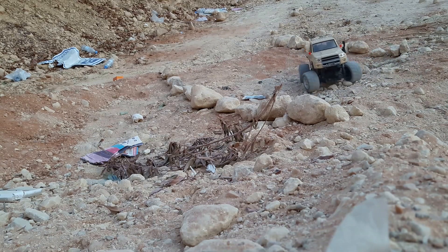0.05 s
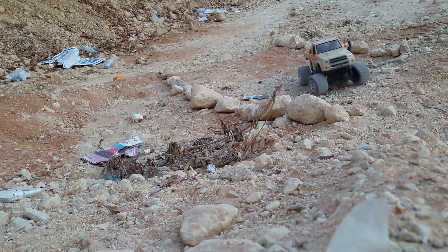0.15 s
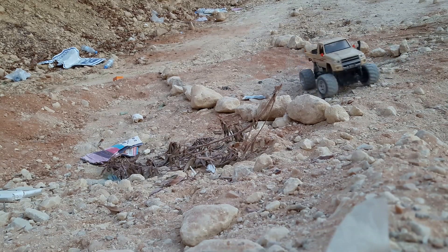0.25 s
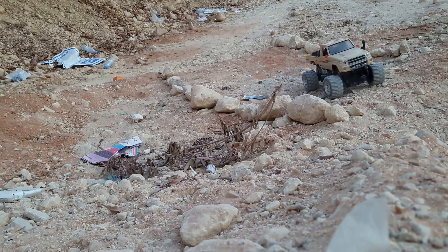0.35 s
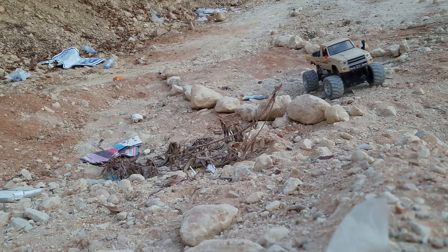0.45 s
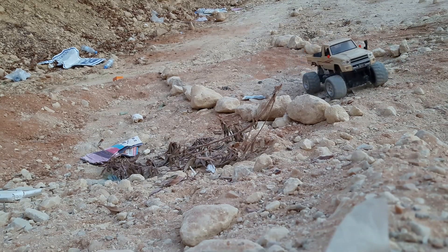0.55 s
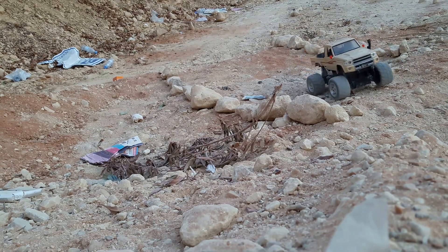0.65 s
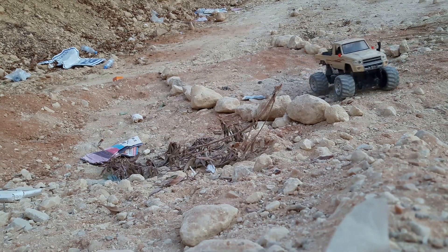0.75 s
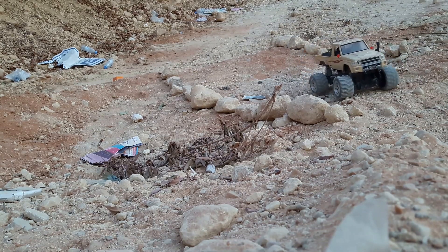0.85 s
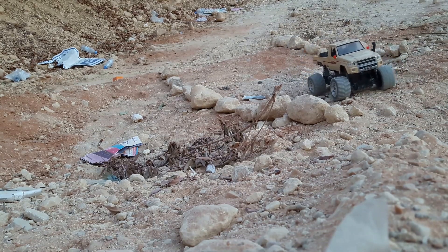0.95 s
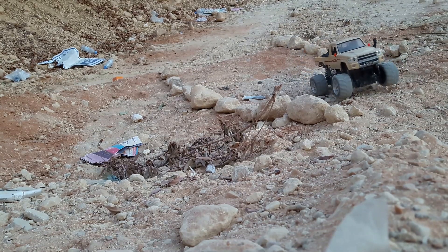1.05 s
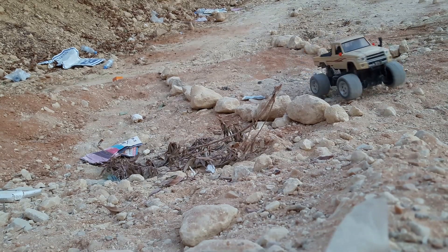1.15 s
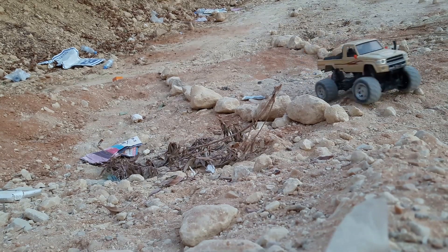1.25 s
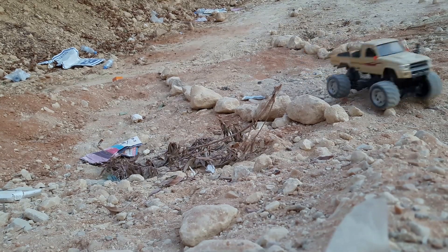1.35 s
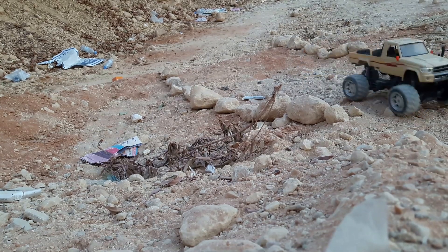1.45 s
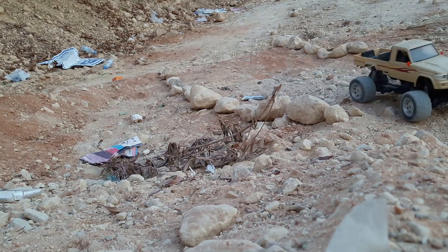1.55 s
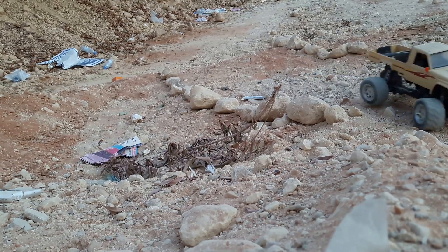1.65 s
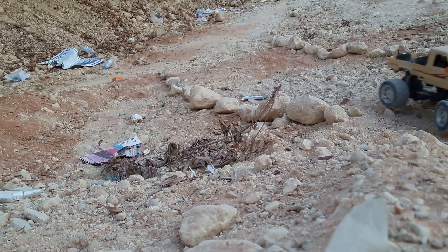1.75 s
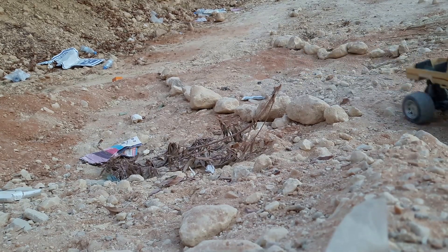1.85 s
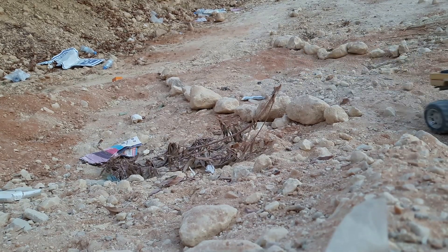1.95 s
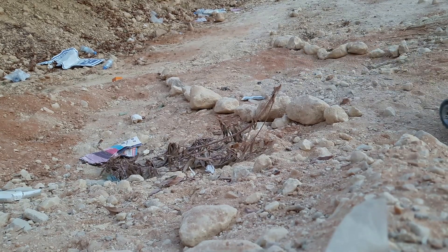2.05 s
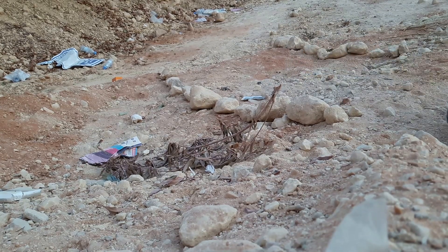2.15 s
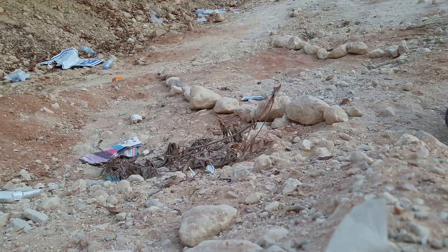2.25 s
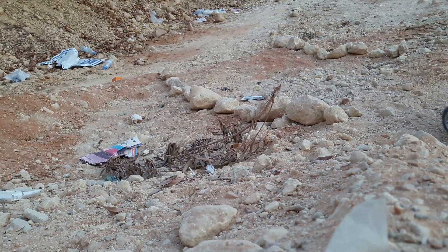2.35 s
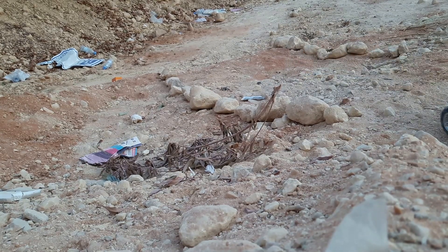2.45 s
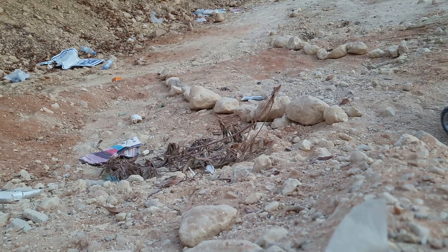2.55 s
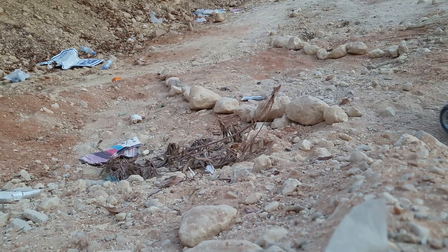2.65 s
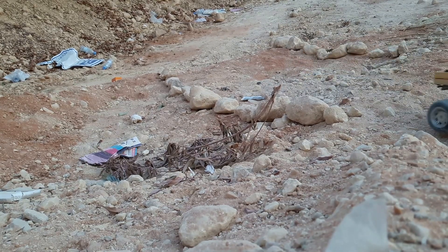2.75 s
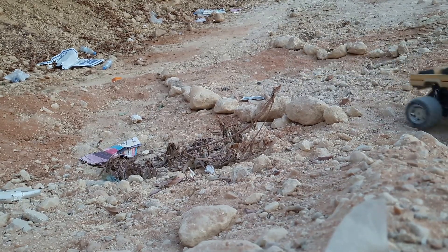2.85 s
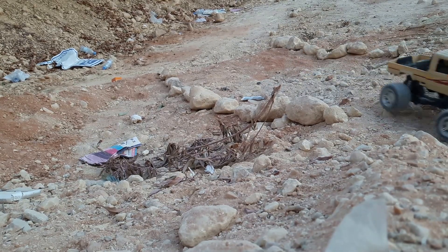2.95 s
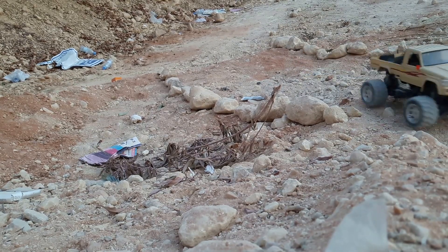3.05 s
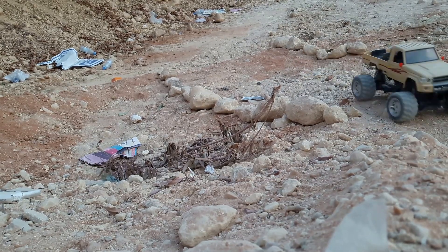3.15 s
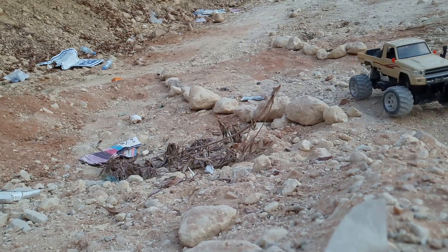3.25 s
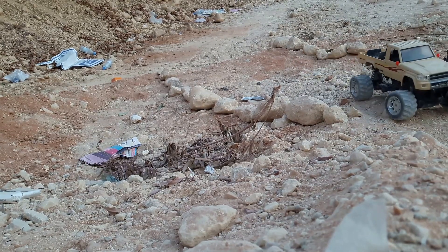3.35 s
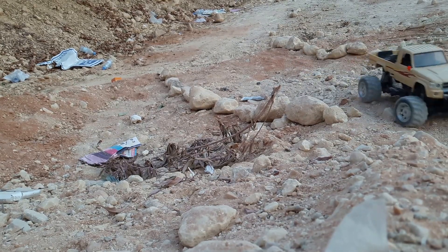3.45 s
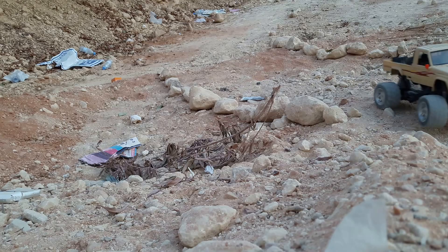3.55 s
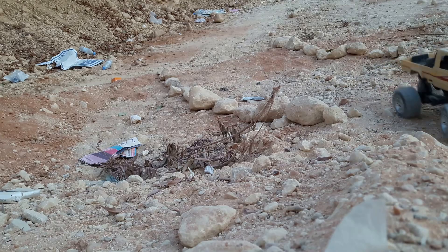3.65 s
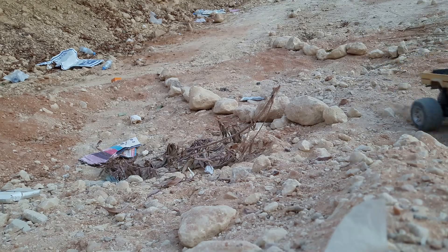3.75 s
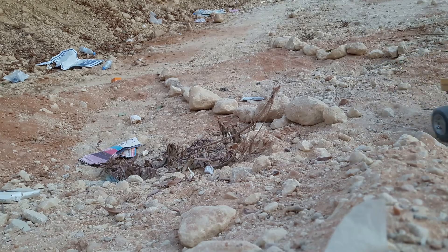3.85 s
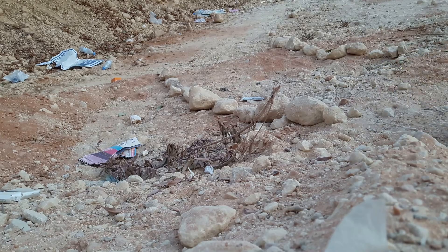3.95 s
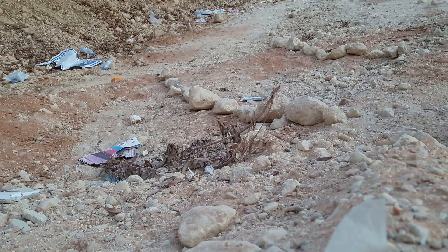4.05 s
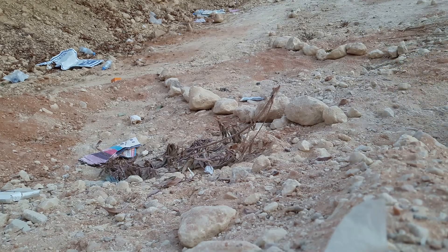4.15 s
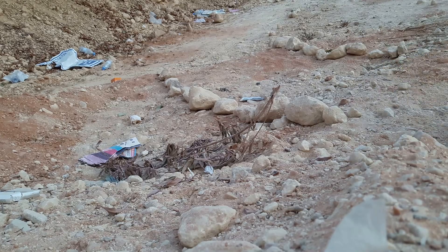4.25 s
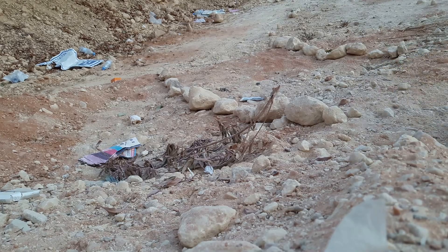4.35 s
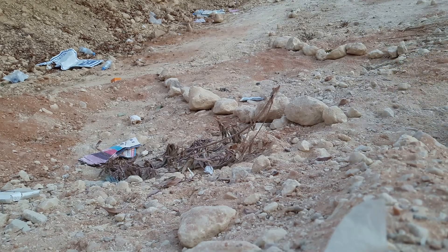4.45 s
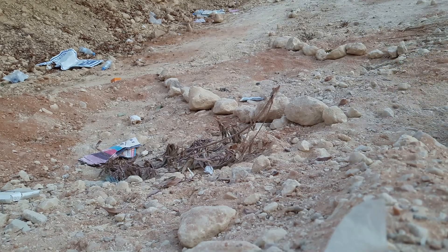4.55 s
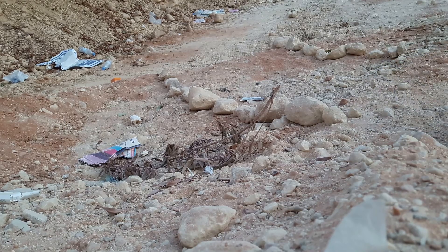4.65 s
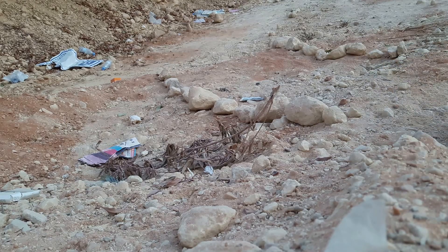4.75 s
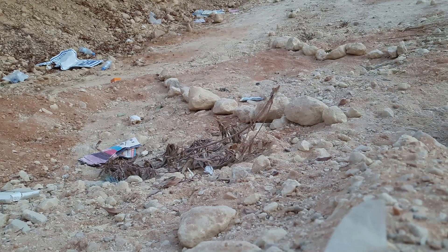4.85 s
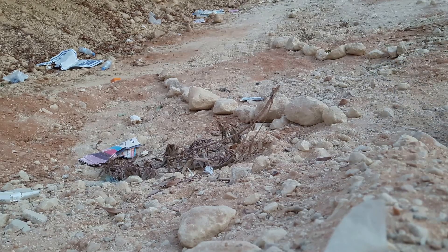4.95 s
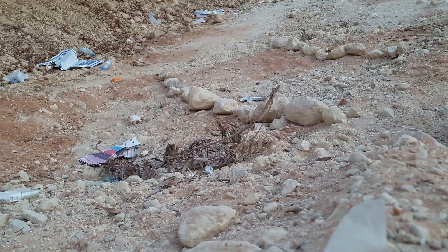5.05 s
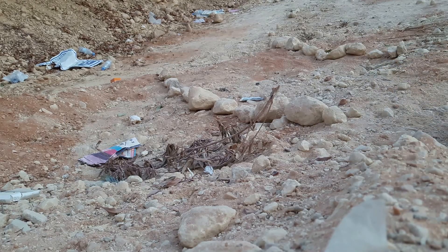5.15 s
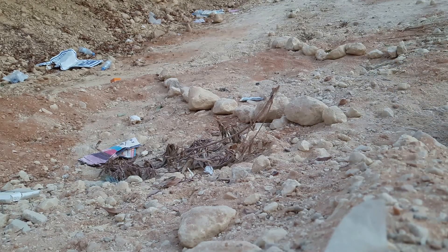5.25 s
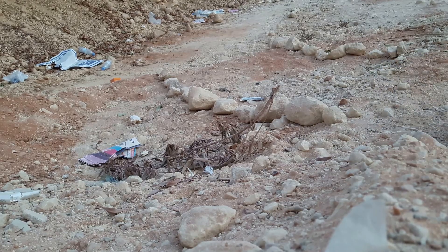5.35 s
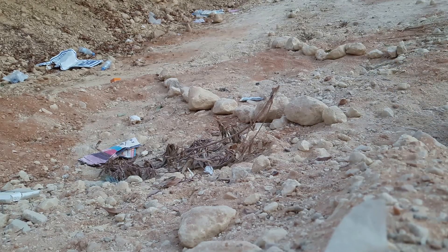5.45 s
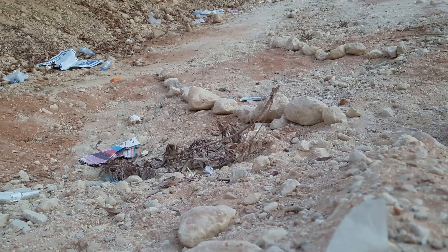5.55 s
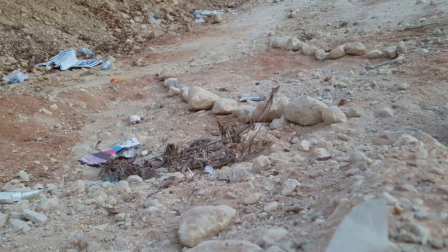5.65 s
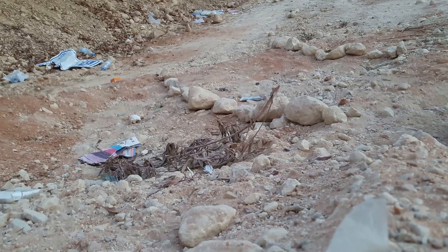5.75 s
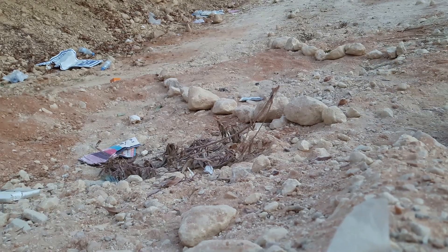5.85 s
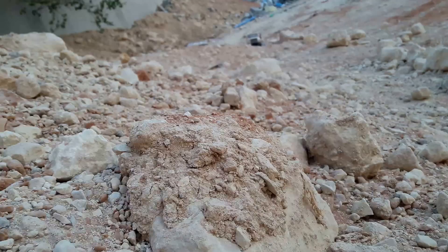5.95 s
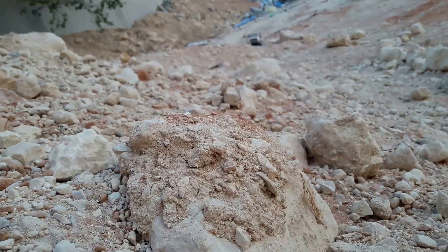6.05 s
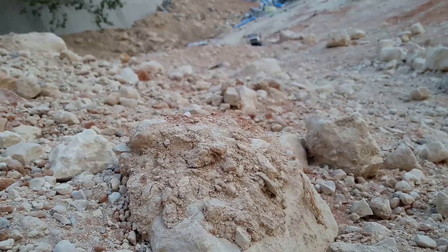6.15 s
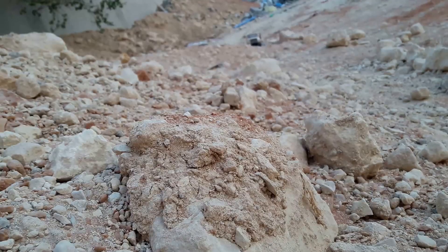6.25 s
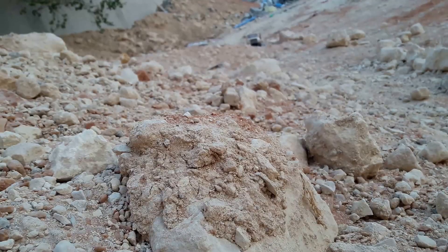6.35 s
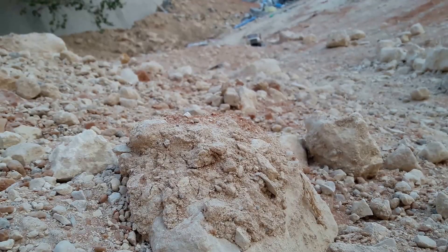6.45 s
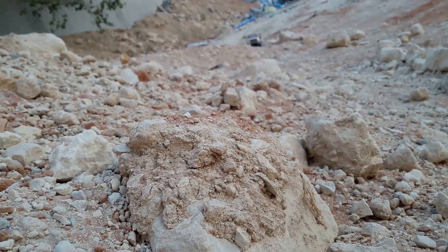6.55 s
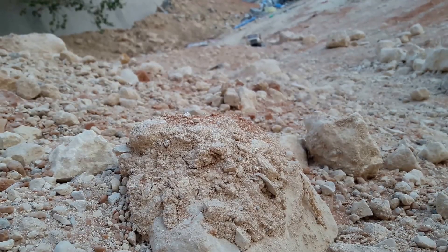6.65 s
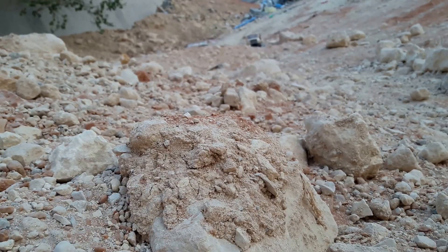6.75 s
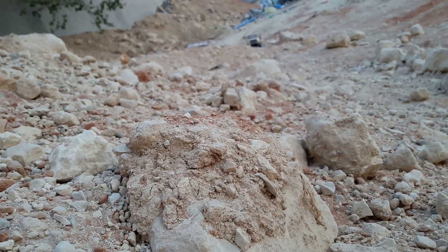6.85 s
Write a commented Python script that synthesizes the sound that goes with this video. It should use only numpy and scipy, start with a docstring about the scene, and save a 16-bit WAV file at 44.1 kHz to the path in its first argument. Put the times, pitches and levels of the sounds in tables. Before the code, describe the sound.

Stop-and-start gravel grinding, hollow plastic knocks and short rubbery squeals die into quiet pebble ticks; abruptly, louder distant traffic and echoing horns.

```python
"""A model truck scrabbles over loose stones in bursts, to the right of two spaced microphones.
Noise-driven contacts grind its hollow shell; bending tones squeal; damped rings knock and tick.
Small rustles lie nearby. Far off are low filtered road noise, a rising engine drone and faint horns.
At 6.06 s the scene changes: the road is louder, a hum fades and car horns echo over the hillside."""
import sys
import numpy as np
from scipy import signal
from scipy.fft import rfft, irfft
from scipy.io import wavfile
from scipy.ndimage import uniform_filter1d

SR = 44100
rng = np.random.default_rng(int(sys.argv[2]) if len(sys.argv) > 2 else 0)


def transcribe(u):
    """Save the signal u as a 16-bit wav file named by the first command-line argument.

    u: samples, shape (n,) or (channels, n), limited to [-1, 1]; the rate is SR.
    q: integer samples, one column per channel.
    """
    v = np.clip(np.atleast_2d(u).T, -1, 1)
    q = np.round(v * 32767).astype(np.int16)
    wavfile.write(sys.argv[1], SR, q)


N = 304290

# Pushes of the throttle, a list for each. Each row: time in seconds, grind level in dB,
# grit relative to grind in dB.
THROTTLE_PUSHES = [
    [(0.0, -25.5, -15), (0.02, -40.5, -11), (0.046, -20.5, -15), (0.058, -30, -14), (0.258, -28.5, -9),
     (0.302, -31.5, -13), (0.326, -30, -16), (0.36, -41, -16.5), (0.43, -34.5, -8), (0.534, -55, -24),
     (0.544, -51, -20), (0.56, -60, -15)],
    [(0.57, -59, -24), (0.598, -23.5, -15), (0.636, -27.5, -18), (0.652, -29, -8), (0.69, -30.5, -11.5),
     (0.718, -39, -23), (0.734, -23.5, -10), (0.856, -35.5, -15.5), (0.862, -43.5, -11), (0.9, -40, -20),
     (0.914, -49.5, -19), (0.96, -60, -25)],
    [(0.97, -58, -16), (0.986, -31, -14), (1.008, -35, -15), (1.022, -27, -12), (1.182, -29, -11),
     (1.186, -31, -9), (1.354, -27.5, -7), (1.36, -25, -9), (1.456, -32.5, -8), (1.498, -24, -12.5),
     (1.51, -31.5, -11), (1.63, -34, -16.5)],
    [(1.64, -9, -27), (1.65, -32.5, -10), (1.68, -26.5, -8.5), (1.8, -29.5, -6.5), (1.818, -28, -6.5),
     (1.904, -22.5, -10.5), (1.91, -32, -10.5), (2.048, -25.5, -8.5), (2.086, -33.5, -14),
     (2.242, -42, -13), (2.42, -74, -28), (2.5, -41.5, -16)],
    [(2.744, -52, -4), (2.772, -23, -13), (2.788, -28, -9), (2.91, -26, -8.5), (2.946, -35, -7),
     (2.966, -25, -7), (3.082, -30.5, -4.5), (3.12, -26, -13), (3.13, -36, -16), (3.236, -28, -15),
     (3.43, -53.5, -24), (3.44, -49, -20)],
    [(3.46, -35, -28), (3.47, -51, -19), (3.502, -25.5, -10), (3.658, -28.5, -7), (3.678, -30.5, -4.5),
     (3.896, -26, -7), (3.924, -22, -14), (3.936, -27.5, -4.5), (4.056, -33, -9.5), (4.062, -27.5, -9),
     (4.246, -50, -13), (4.3, -47, -22)],
    [(4.32, -44, -16), (4.34, -58, -13), (4.36, -48.5, -17), (4.416, -54.5, -13), (4.488, -43.5, -20),
     (4.524, -56, -15), (4.708, -46, -14.5), (4.81, -57, -9), (4.84, -37.5, -22), (4.866, -52, -11),
     (5.084, -65.5, -14), (5.15, -51, -20)],
]
# Tyre lugs slipping on rock. Each row: start in seconds, length in seconds, first, middle and
# last pitch in Hz, level in dB, octave relative to the tone in dB.
SQUEALS = [(0.03, 0.05, 1059, 948, 695, -27, -26), (0.072, 0.048, 700, 784, 750, -28, -11),
           (0.132, 0.027, 773, 608, 616, -24.5, -19), (0.166, 0.036, 892, 1006, 1006, -23, -16),
           (0.212, 0.049, 761, 633, 536, -24.5, -8.5), (0.253, 0.021, 710, 718, 789.0, -28, -11),
           (0.589, 0.064, 688, 576, 597, -28.5, -7), (0.672, 0.029, 890, 788, 590, -29, -7),
           (0.732, 0.036, 550, 560, 610, -27, -20), (1.014, 0.024, 590, 566, 593, -29, -10),
           (1.05, 0.058, 849, 874, 1050, -27.5, -10), (1.108, 0.041, 906, 840, 666, -31, -11),
           (1.133, 0.044, 593, 745, 1020, -29, -17), (1.201, 0.046, 1054, 1086, 1080, -29, -8),
           (1.257, 0.057, 1230, 1155, 1175.0, -34.0, -9), (1.365, 0.032, 734, 809, 1000, -25, -13),
           (1.48, 0.032, 760, 620, 596, -32, -8.0), (1.66, 0.03, 898, 970, 910, -24.5, -19),
           (1.685, 0.029, 900, 786, 696, -25.5, -11.0), (1.712, 0.025, 850, 773, 734, -24.5, -8),
           (1.742, 0.037, 863, 813, 800, -27, -13.0), (1.792, 0.089, 984, 702, 773, -27, -10),
           (1.868, 0.026, 1027, 890, 750, -28, -5), (1.979, 0.049, 1232, 1119, 1080, -29.5, 10.5),
           (2.031, 0.036, 752, 764, 716, -29.5, -3), (2.762, 0.025, 1000.0, 850, 696, -25.5, -4),
           (2.798, 0.075, 803, 592, 700, -28, -12), (2.864, 0.033, 800, 930, 830, -27, 4),
           (2.889, 0.057, 876, 907, 775, -24, 5.5), (2.954, 0.0231, 980, 903, 750, -26.5, 0),
           (2.974, 0.017, 805, 944, 1070, -18.5, -5), (2.994, 0.032, 950, 1066, 980, -24, 1),
           (3.019, 0.019, 930, 727, 640, -22, -0.5), (3.044, 0.02, 1210, 1150, 1000, -29, 4),
           (3.093, 0.046, 594, 727, 760.0, -38, -8), (3.494, 0.044, 627, 739, 720, -28.5, -13),
           (3.528, 0.038, 910, 977, 1050, -37, 2.0), (3.554, 0.071, 1075, 1089, 1080, -25.5, -4),
           (3.608, 0.036, 817, 600, 760, -22, -24), (3.64, 0.041, 905, 861, 710, -23.5, -15),
           (3.75, 0.026, 1230, 936, 665, -23.5, -17), (3.785, 0.044, 568, 615, 603, -34.5, -0.5),
           (3.852, 0.064, 1167, 1218, 870, -29, -9), (3.913, 0.032, 710, 745, 751.0, -26.5, -18)]
# Stones knocking the shell. Each row: start in seconds, ring level in dB, ring pitch in Hz,
# crack and snap levels in dB before their own offsets.
KNOCKS = [(.045, -4.5, 980, -45, -15.5), (0.174, -3.5, 922, -32, -38), (.225, -7.5, 765, -28, -17),
          (.328, -13, 595, -47, -34), (.37, -27, 557, -44, -33), (.418, -27, 580, -50, -45),
          (.487, -20, 1310, -44, -41), (.59, -18, 705, -48, -38), (0.607, -9.5, 514, -44, -12.5),
          (.63, -8.5, 572, -35, -21), (0.735, -27, 560, -34, -12), (.984, -21, 592, -34, -33),
          (1.022, -13, 570, -35, -33), (1.118, -7, 920, -32, -33), (1.26, -9, 1130, -25, -24),
          (1.319, -8, 1320, -41, -38), (1.361, -7.5, 850, -21, -26), (1.543, -14.5, 765, -29, -22),
          (1.576, -18, 756, -21.5, -13.5), (1.632, -14, 800, -27.5, -22), (1.67, -6.5, 930, -41, -34),
          (1.682, -1, 860, -36, -36), (1.723, -5, 802, -22.5, -33), (1.819, -10.5, 743, -27, -35),
          (1.881, -4.5, 966, -24, -30), (1.958, -7.5, 1006, -21.5, -17), (1.983, -30, 885, -22, -12),
          (2.204, -26.5, 513, -33, -42), (2.284, -32, 560, -36, -56), (2.32, -40, 624, -45, -56),
          (2.768, -19, 796, -19.5, -34), (2.959, -15, 933, -42, -38), (3.161, -17, 825, -21, -14),
          (3.178, -13, 795, -29, -29), (3.221, -21, 640, -24.5, -16), (3.309, -43, 900, -32.5, -22),
          (3.499, -26, 700, -45, -31), (3.65, -3, 840, -24, -25), (3.754, -15, 790, -35, -11),
          (3.814, -34, 815, -35, -26), (3.864, -25, 810, -36, -27), (3.905, -21, 1590, -24, -28),
          (4.02, 0, 3180, -20.5, -25), (4.062, -13.5, 860, -22.5, -34), (4.257, -40, 825, -43, -52),
          (4.293, -30, 660, -41, -48), (4.361, -25.5, 670, -44, -52), (4.472, -28, 880, -40.5, -54)]
# Single pebbles ticking on rock. Each row: start in seconds, ring level in dB, ring pitch in Hz,
# snap centre in Hz, snap level in dB before halving.
TICKS = [(.543, -21.5, 1320, 2370, -24), (.893, -22, 1210, 2800, -23.5), (2.638, -34, 900, 2000, -36),
         (2.661, -18, 1320, 2500, -26), (2.680, -12, 1430, 2680, -23.5), (2.702, -8.5, 1380, 2500, -26),
         (3.445, -16.5, 1000, 2020, -16.5), (4.689, -42, 860, 2700, -31), (4.8359, -18, 850, 1450, -18),
         (4.847, -21, 1150, 1600, -22), (4.852, -28, 900, 1300, -26), (4.859, -31, 810, 1400, -30),
         (4.886, -33, 870, 1400, -34), (4.911, -21.5, 1260, 1690, -27), (4.934, -29, 1240, 1400, -35),
         (4.967, -34, 800, 1600, -33), (5.017, -44, 900, 1300, -37), (5.176, -28.5, 940, 4700, -37)]
# Spectra of the hollow shell, of sand and gears, and of a stone's crack.
# Each row: frequency in Hz, relative level in dB per Hz.
SHELL_SPECTRUM = [(88, -69), (150, -17), (353, -18), (575, -2), (674, -5.5), (913, -1.5), (1430, -9.5),
                  (2070, -4), (2690, -17), (3500, -31), (4550, -64), (7700, -120)]
GRIT_SPECTRUM = [(1470, -41), (2500, -1.5), (3860, -6), (4110, -5), (4440, -10), (5480, -13.5),
                 (8270, -10.5), (9290, -19), (11500, -13.5), (13500, -24), (15200, -21), (16000, -45)]
CRACK_SPECTRUM = [(710, -4), (1200, -3), (1560, 2), (2130, 4.5), (3220, -7.5), (5070, -26), (7570, -24),
                  (9930, -73), (16000, -42)]
# The truck moving to the right and back. Each row: time in seconds, left microphone's lag in samples.
TRUCK_PLACE = [(0.1, 4), (1.3, 6), (2.2, 11), (2.9, 11), (3.2, 8), (3.9, 8), (4.3, 12), (4.9, 8)]
# Likeness of the two microphones for the truck, for its squeals and for the road.
# Each row: frequency in Hz, likeness from 0 to 1.
TRUCK_LIKENESS = [(250, 1), (600, .99), (1000, .95), (2500, .87), (5000, .58), (12000, .5)]
SQUEAL_LIKENESS = [(500, 1), (3000, .97)]
ROAD_LIKENESS = [(60, 1), (150, 1), (400, 0.97), (1000, 0.6), (3000, 0.085), (9000, 0.067)]
# Faint rustles, scrapes and chirps nearby. Each row: start in seconds, length in seconds,
# centre in Hz, width in Hz, level in dB.
RUSTLES = [(4.505, .015, 11200, 500, -62), (4.742, .028, 5400, 2600, -55), (4.77, .025, 5400, 2600, -62),
           (5.668, .05, 3460, 80, -63), (5.672, .025, 4050, 300, -67), (6.015, .028, 7500, 3000, -63),
           (6.03, .016, 13500, 3000, -67), (6.041, .005, 6000, 5500, -57), (6.073, .012, 3000, 1600, -47)]
# A low and a high horn, direct and echoed. Each row: start and stop in seconds, pitch in Hz,
# low tone in dB, blare in dB, tilt from 2.65 to 2.85 kHz in dB, treble in dB.
HORNS = [(5.143, 5.29, 365, -61, -63, -16, -20), (5.3, 5.393, 365, -68, -65, -16, -20),
         (5.406, 5.56, 365.5, -66, -64, -16, -20), (5.57, 5.64, 365, -70, -68, -10, -20),
         (6.571, 6.605, 395, -33, -70, 0, -20), (6.583, 6.712, 365.5, -26, -48, 16, -20),
         (6.585, 6.705, 420, -33, -28.5, -16, -1), (6.665, 6.75, 420, -60, -31, -16, -22),
         (6.635, 6.694, 373, -50, -35, -1, -8), (6.685, 6.795, 374.3, -33, -27, -3, -17),
         (6.689, 6.855, 429.3, -23, -38, 12, -12), (6.695, 6.89, 363, -27.5, -52, -3, -23),
         (6.77, 6.94, 374.5, -50, -44, -1, -20), (6.8, 6.94, 421.5, -37, -41, -14, -25)]
# Resonances of the horn disc. Each row: frequency in Hz, relative level in dB.
HORN_DISC = [(700, -31), (850, -8.5), (1200, -43), (1700, -19.5), (1880, -25), (2100, -19), (2280, -27),
             (2500, -1), (3000, -2), (3400, -11.5), (3800, -18), (4300, -29), (5300, -19), (6200, -34),
             (7400, -22.5), (9500, -33), (10800, -34), (11900, -22.5), (13400, -40), (14800, -34)]
# Distant road before and after the scene change, a list for each.
# Each row: frequency in Hz, relative level in dB per Hz.
ROAD_SPECTRA = [
    [(12, -71), (20, -29), (32, -40), (46, -13.5), (123, -3), (154, -8), (422, -14.5), (499, -15.5),
     (2390, -31), (2600, -34.5), (3160, -36.5), (3440, -41), (16000, -58.5)],
    [(12, -69), (20, -39), (37, -35), (48, -20), (86, -6), (198, -4), (277, -10.5), (527, -9.5), (976, -17),
     (1330, -24.5), (1760, -23.5), (2670, -28), (5850, -47.5), (7520, -46.5), (12000, -59), (16000, -70)],
]
# Road level before and after the scene change, in dB.
ROAD_LEVELS_DB = [-47.5, -40]
# Engine hum that fades after the change. Each row: pitch in Hz, level in dB, fade in dB per second.
HUM = [(201.5, -41.5, -8.5), (237, -38.5, -40)]
# A far engine gathering speed. Each row: time in seconds, pitch in Hz, level in dB.
DRONE = [(4.1, 100, -75), (4.35, 103.8, -48), (4.8, 110, -52), (5.2, 118.8, -49), (5.5, 120.6, -66),
         (5.751, 122.7, -46), (5.95, 126, -70)]
# Microphone noise. Each row: frequency in Hz, relative level in dB per Hz.
HISS_SPECTRUM = [(5000, -9), (9000, -37), (11500, 1), (13500, 7), (16000, 2.5)]

HISS_DB, EDGE_HZ = -73, 15800  # hiss of each microphone, upper band limit
ROAD_LAG, HORN_LAG = 15.5, 17.9  # samples, left microphone later
CENTRE_DB, DB_PER_LAG = 2.6, -.33  # left above right, falling as the lag grows
BITE, SWELL = 0.88, 0.55  # exponents: a slip peaks early (under 1), its swell is flat-topped (under 1)
GLIDE = .2  # a loose stone's ring bends by up to this share in 10 ms
RING_CYCLES, CRACK_T60_S, SNAP_HZ = 20, 0.023, 4150  # a knock's ring falls 60 dB in so many cycles
TICK_CYCLES, TICK_T60_S, TICK_RISE_S = 10, .018, .0004
RASP_DB = .7  # flutter of the horn disc at 5 kHz, growing with frequency
SCENE_CHANGE_S = 6.0635
JOIN_DB, JOIN_S = -30, 0.0007  # jump in pressure at the change, and its time constant


def gain_of(db):
    """Decibels to gain."""
    return 10 ** (np.asarray(db) / 20)


def evened(x):
    """Scales to rms 1."""
    return x / np.sqrt(np.mean(x ** 2) + 1e-20)


def read(points, hz):
    """Reads a table on a log-frequency axis."""
    f, value = np.transpose(points)
    return np.interp(np.log(hz + 1), np.log(f + 1), value)


def add(mix, s, sound):
    """Mixes a sound in at time s."""
    part = mix[round(s * SR):][:len(sound)]
    part += sound[:len(part)]


def colour(x, points):
    """Filters by a spectrum table, rms 1."""
    hz = np.fft.rfftfreq(len(x), 1 / SR)
    return evened(irfft(rfft(x) * gain_of(read(points, hz)), len(x)))


def wander(count, seconds):
    """Smooth random curve, rms about 1."""
    width = max(round(seconds * SR), 2)
    noise = rng.standard_normal(count + 2 * width)
    return evened(uniform_filter1d(uniform_filter1d(noise, width), width))[:count]


def microphones(x, lag, likeness, size=512):
    """Two spaced microphones: the left hears later, its phases scrambled where likeness is low."""
    hz, t, z = signal.stft(x, SR, nperseg=size)
    same = np.clip(read(likeness, hz), 0, 1)[:, None]
    scramble = np.exp(2j * np.pi * rng.random(z.T.shape)).T
    lag_now = np.interp(t * SR, np.arange(N), lag * np.ones(N))
    late = np.exp(-2j * np.pi * hz[:, None] * lag_now / SR)
    left = z * late * (same + np.sqrt(1 - same ** 2) * scramble * 1.35)
    return np.array([signal.istft(left, SR, nperseg=size)[1][:N], x])


def ground_echoes(x, t60, seconds=.5):
    """Scattered echoes off the rocky ground: sparse decaying taps of total energy 1."""
    t = np.arange(round(seconds * SR)) / SR
    sparse = rng.choice([-1., 1.], len(t)) * (rng.random(len(t)) < .06)
    taps = sparse * gain_of(-60 * t / t60) * (t > .003)
    return signal.oaconvolve(x, taps / np.linalg.norm(taps))[:N]


def truck():
    """Grind, squeals, knocks and ticks share one moving place."""
    t = np.arange(N) / SR
    power, grit_db = np.full(N, 1e-12), np.zeros(N)
    for rows in THROTTLE_PUSHES:
        s, db, rel_db = np.transpose(rows)
        span = t[round(s[0] * SR):round(s[-1] * SR)]
        push = gain_of(2 * np.interp(span, s, db))  # doubled dB gives power
        add(power, s[0], push * signal.windows.tukey(len(span), .04))
        add(grit_db, s[0], np.interp(span, s, rel_db))
    body = grind(10 * np.log10(power), grit_db)
    squeals, ticks = np.zeros((2, N))
    for row in SQUEALS:
        add(squeals, *squeal(*row))
    for s, *blow in KNOCKS:
        add(body, s, knock(*blow, rng.standard_normal(2048)))
    for s, *blow in TICKS:
        add(ticks, s, tick(*blow, rng.standard_normal(1024)))
    body += gain_of(-10.0) * ground_echoes(body, 0.025)
    ticks += gain_of(-9.5) * ground_echoes(ticks, 0.024)
    squeals += gain_of(-22.0) * ground_echoes(squeals, 0.21)
    lag = np.interp(t, *np.transpose(TRUCK_PLACE))
    heard = microphones(body, lag, TRUCK_LIKENESS, size=256)
    heard += microphones(ticks, lag, TRUCK_LIKENESS, size=96)
    heard += microphones(squeals, lag, SQUEAL_LIKENESS, size=256)
    return heard * gain_of(np.outer([.5, -.5], CENTRE_DB + DB_PER_LAG * lag))


def grind(level_db, grit_db):
    """Many small stone contacts, uneven in size and clumped, drive the shell and a hiss of grit."""
    lumps = wander(N, 0.015)
    size = gain_of(0.75 * np.minimum(rng.exponential(1, N), 5))
    contacts = size * (rng.random(N) < 2500 / SR) * rng.standard_normal(N)  # 2500 a second
    rub = 0.5 * evened(contacts) + 0.49 * rng.standard_normal(N)
    shell = colour(rub * gain_of(1.52 * lumps), SHELL_SPECTRUM)
    unevenness = gain_of(2.1 * lumps + 1.66 * wander(N, 0.1))
    sand = colour((1.76 * rub + rng.standard_normal(N)) * unevenness, GRIT_SPECTRUM)
    low = gain_of(-1.0) * shell + gain_of(-5.0) * chatter(521, 1314, 120, 32.7)
    high = sand + gain_of(3.0) * chatter(1415, 3555, 500, 97.0)
    return gain_of(level_db) * low + gain_of(level_db + grit_db) * high


def chatter(low_hz, high_hz, per_s, cycles):
    """Loose stones clink together, each with its own short, bending ring; a few are large."""
    size = gain_of(1.77 * np.minimum(rng.exponential(1, N), 5)) * (rng.random(N) < per_s / SR)
    pebble, t = rng.integers(0, 24, N), np.arange(1600) / SR
    total = np.zeros(N)
    for k, hz in enumerate(np.geomspace(low_hz, high_hz, 24)):
        bend = rng.uniform(-GLIDE, GLIDE)
        tone = np.sin(2 * np.pi * hz * t * (1 + bend * t / 0.02025))
        ring = tone * gain_of(-60 * t * hz / cycles) * np.minimum(t / 0.0025, 1)
        total += signal.oaconvolve(size * (pebble == k), ring)[:N]
    return evened(total)


def squeal(start, length, first_hz, middle_hz, last_hz, db, octave_db):
    """Stick-slip of a lug: an unsteady tone that bends through three pitches, with overtones."""
    t = np.arange(0, length, 1 / SR)
    swell = abs(np.sin(np.pi * (t / length) ** BITE))
    curve = np.polyfit([0, length / 2, length], [first_hz, middle_hz, last_hz], deg=2)
    turns = np.cumsum(np.polyval(curve, t) * (1 + .018 * wander(len(t), .008))) / SR
    overtones = gain_of(octave_db) * (np.sin(4 * np.pi * turns) + .12 * np.sin(6 * np.pi * turns))
    grip = gain_of(db + 2.34 * wander(len(t), 0.0029)) * swell ** SWELL
    return start, np.sqrt(2) * (np.sin(2 * np.pi * turns) + overtones) * grip


def knock(db, hz, crack_db, snap_db, noise):
    """A damped ring of stone on shell under a brief broad crack and a bright snap."""
    t = np.arange(len(noise)) / SR
    ring = gain_of(db - 60 * t * hz / RING_CYCLES) * np.sin(2 * np.pi * hz * t)
    ring *= 1 - np.exp(-t / 0.0018)
    crack = colour(noise, CRACK_SPECTRUM) * gain_of(crack_db + 6.0 - 60 * t / CRACK_T60_S)
    return (ring + crack) * (1 - np.exp(-t / 0.00062)) + snap(snap_db, SNAP_HZ, noise[::-1])


def snap(db, hz, noise):
    """A noise burst of a few milliseconds, broad around its centre."""
    t = np.arange(len(noise)) / SR
    burst = colour(noise, [(hz / 5, -18), (hz, 0), (hz * 3, -9)])
    return gain_of(db - 14.5 - 60 * t / 0.041) * (1 - np.exp(-t / 0.0022)) * burst


def tick(db, hz, snap_hz, snap_db, noise):
    """Stone on stone: a ring of a few cycles and a dry snap."""
    t = np.arange(len(noise)) / SR
    dull_db = 11 * 2500 / snap_hz  # low, far ticks have a steeper treble loss
    dry_snap = colour(noise, [(snap_hz / 3, -14), (snap_hz, 0), (snap_hz * 1.5, -4),
                              (snap_hz * 2, -dull_db), (snap_hz * 3, -2 * dull_db),
                              (snap_hz * 8, -4 * dull_db)])
    dry_snap *= gain_of(snap_db - 60 * t / TICK_T60_S) / 2
    ring = gain_of(db - 60 * t * hz / TICK_CYCLES) * np.sin(2 * np.pi * hz * t)
    return (ring + dry_snap) * (1 - np.exp(-t / TICK_RISE_S)) ** 2


def rustles():
    """Short bands of noise, faded in and out."""
    mix = np.zeros(N)
    for s, seconds, hz, width, db in RUSTLES:
        band = [(hz - width, -30), (hz - width / 2, 0), (hz + width / 2, 0), (hz + width, -30)]
        puff = colour(rng.standard_normal(4096), band)[:round(seconds * SR)]
        add(mix, s, gain_of(db) * puff * signal.windows.tukey(len(puff), .5))
    return microphones(mix, ROAD_LAG, TRUCK_LIKENESS)


def horns():
    """A buzzing armature gives a low tone; its overtones ring the disc near 2.5 to 3 kHz."""
    mix = np.zeros(N)
    for start, stop, hz, low_db, blare_db, tilt_db, treble_db in HORNS:
        t = np.arange(0, stop - start, 1 / SR)
        left_s = t[-1] - t
        turns = np.cumsum(hz * (1 + 0.0015 * wander(len(t), 0.022))) / SR
        k = np.arange(2, 40)[:, None]  # overtone numbers
        tone_shape = [(2650, 0), (2850, tilt_db), (3500, 0), (4500, treble_db)]
        db = blare_db + read(HORN_DISC, k * hz) + read(tone_shape, k * hz)
        rasp_db = RASP_DB * k * hz / 5000 * wander(len(t), .002)
        overtones = np.sin(2 * np.pi * (k * turns + rng.random(k.shape)))
        blare = (gain_of(db + rasp_db) * overtones).sum(0)
        blare *= np.minimum(left_s / 0.041, 1)  # the disc dies first
        sound = np.sqrt(2) * (gain_of(low_db) * np.sin(2 * np.pi * turns) + blare)
        add(mix, start, sound * np.clip(np.minimum(t / 0.0041, left_s / 0.031), 0, 1))
    mix += gain_of(-18.5) * ground_echoes(mix, 1.0)
    return microphones(mix, HORN_LAG, [(300, 0.99), (3000, 0.85), (15000, 0.32)], size=768)


def traffic(spectrum, db):
    """Far traffic: filtered noise with a level that flickers slightly."""
    return gain_of(db + 1.0 * wander(N, 0.011)) * colour(rng.standard_normal(N), spectrum)


def engine_drone(t):
    """A far engine gathering speed: one unsteady tone gliding upward."""
    s, hz, db = np.transpose(DRONE)
    pitch = np.interp(t, s, hz) * (1 + 0.0147 * wander(N, 0.065))
    level = gain_of(np.interp(t, s, db) + 1.8 * wander(N, 0.07))
    return level * np.sin(2 * np.pi * np.cumsum(pitch) / SR)


def engine_hum(since):
    """An engine dying away: two unsteady tones fade at their own rates after the change."""
    total = np.zeros(N)
    for hz, db, fade_db in HUM:
        level = gain_of(db + fade_db * np.maximum(since, 0) + 2.0 * wander(N, 0.027))
        pitch = hz * (1 + 0.00956 * wander(N, 0.049))
        total += level * np.sin(2 * np.pi * np.cumsum(pitch) / SR)
    return total


def road():
    """Traffic with a drone, then after the abrupt change louder traffic with a hum."""
    t = np.arange(N) / SR
    since = t - SCENE_CHANGE_S
    before = traffic(ROAD_SPECTRA[0], ROAD_LEVELS_DB[0]) + engine_drone(t)
    after = traffic(ROAD_SPECTRA[1], ROAD_LEVELS_DB[1]) + engine_hum(since)
    jump = gain_of(JOIN_DB) * np.exp(-abs(since) / JOIN_S)
    heard_before = microphones(before, ROAD_LAG, ROAD_LIKENESS, size=2048)
    heard_after = microphones(after, ROAD_LAG, ROAD_LIKENESS, size=2048) + jump
    return np.where(since < 0, heard_before, heard_after)


def scene():
    """Truck, then rustles, horns and road with the left microphone 0.8 dB above the right."""
    return truck() + (rustles() + horns() + road()) * gain_of([[.4], [-.4]])


def record(dry):
    """Each microphone adds its own faint hiss; then the band limit."""
    noise = rng.standard_normal((2, N))
    hiss = gain_of(HISS_DB) * np.array([colour(v, HISS_SPECTRUM) for v in noise])
    band_limit = signal.firwin(511, EDGE_HZ, window=("kaiser", 9), fs=SR)
    return signal.oaconvolve(dry + hiss, band_limit[None], "same")


dry = scene()
out = record(dry)
transcribe(out)
```